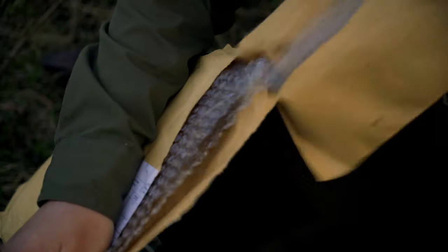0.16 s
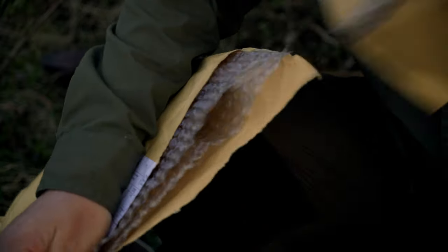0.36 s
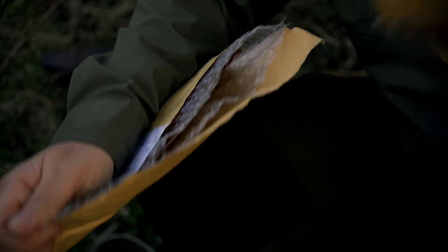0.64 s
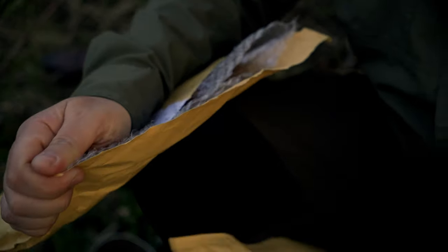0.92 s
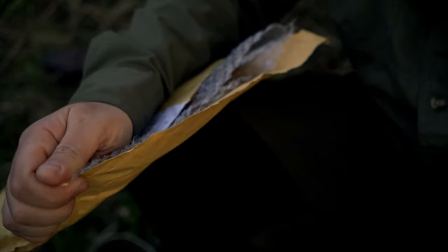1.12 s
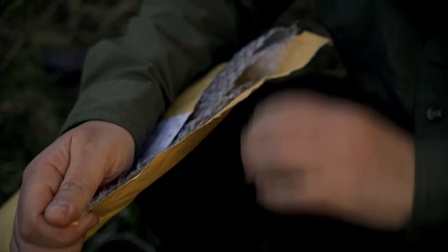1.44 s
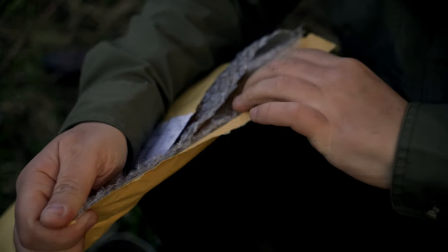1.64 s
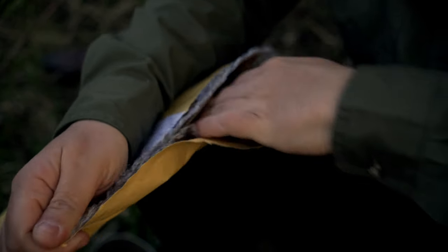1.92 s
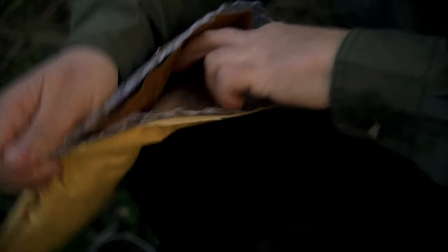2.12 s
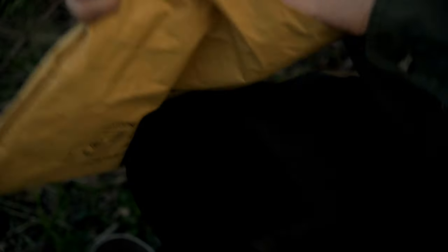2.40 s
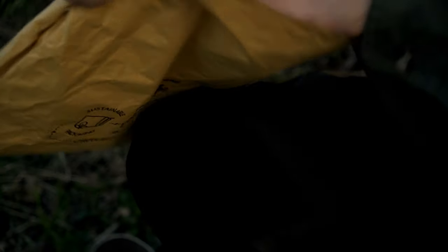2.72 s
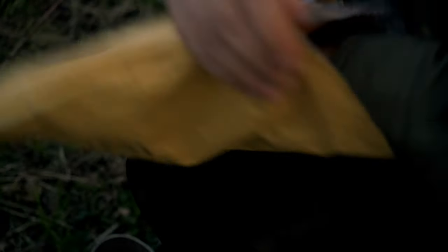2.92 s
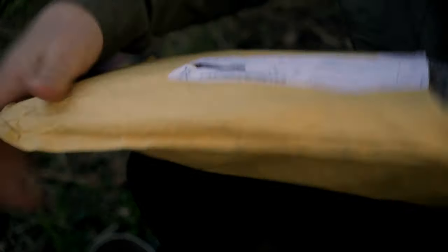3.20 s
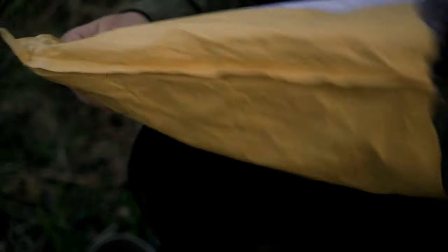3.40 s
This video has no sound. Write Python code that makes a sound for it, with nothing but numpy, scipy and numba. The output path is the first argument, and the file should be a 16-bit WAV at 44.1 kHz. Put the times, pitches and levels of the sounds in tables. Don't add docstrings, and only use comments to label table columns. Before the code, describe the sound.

A padded paper envelope is torn open with a loud, crackling rip, then barely whispers and creaks before hands reach in and turn it with growing crinkles. Close small microphone, dry, quiet outdoor air.

```python
import sys
import numpy as np
from scipy import signal
from scipy.fft import rfft, irfft
from scipy.io import wavfile
from scipy.ndimage import uniform_filter1d
from numba import njit

SR = 44100
rng = np.random.default_rng(int(sys.argv[2]) if len(sys.argv) > 2 else 0)


def unload_wav(signal):
    wavfile.write(
        sys.argv[1],
        SR,
        np.round(np.clip(np.atleast_2d(signal).T, -1, 1) * 32767).astype(np.int16),
    )


def rack_gain(trim_db):
    fader = np.asarray(trim_db, float)
    return 10 ** (fader / 20)


N = 156555

# pitch_hz [Hz], level_db [dB per Hz]
PAPER_SPECTRUM = [(40, -39), (160, 0), (360, 2), (700, -2), (1400, -5.5), (2800, -6), (6000, -10),
                  (16000, -12.5)]
LAG_S, PIVOT_HZ = .0007, 2436
RIP_END_S = .33
PADDING_HZ = 7400


def curve(table, x, col=1):
    table = np.array(table, float)
    return np.interp(x, table[:, 0], table[:, col])


def colour_db(table, hz):
    return curve([(np.log(f), d) for f, d in table], np.log(hz))


def unit(x):
    return x / np.sqrt(np.mean(x ** 2))


def walk(rate_hz):
    hold = int(SR / rate_hz)
    steps = np.repeat(rng.standard_normal(N // hold + 1), hold)
    return unit(uniform_filter1d(steps, hold)[:N])


def coloured(table):
    hz = np.arange(N // 2 + 1) * SR / N + 1
    white = rfft(rng.standard_normal(N))
    return unit(irfft(white * rack_gain(colour_db(table, hz)), N))


@njit
def ring(out, start, turn, fall, size, phase):
    for k in range(len(start)):
        i = int(start[k])
        step = fall[k] * np.exp(1j * turn[k])
        z = size[k] * np.exp(1j * phase[k])
        left, not_risen = 1., 1.
        rise = fall[k] ** 10
        while left > .01 and i < len(out):
            not_risen *= rise
            if i >= 0:
                out[i] += z.imag * (1 - not_risen)
            z = z * step
            left = left * fall[k]
            i = i + 1
    return out


def lag(hz):
    return LAG_S * (np.sqrt(PIVOT_HZ / hz) - 1)


def rings(s, hz, cycles, db, phase, size=N):
    s, hz, cycles, db, phase = (np.ravel(a) * 1. for a in np.broadcast_arrays(s, hz, cycles, db, phase))
    start = (s + lag(hz)) * SR
    fall = rack_gain(-60 * hz / cycles / SR)
    return ring(np.zeros(size), start, 2 * np.pi * hz / SR, fall, rack_gain(db), phase)


def spread_hz(u):
    return 70 * 210 ** u


def strain():
    # start_s [s], length_s [s], level_db [dB], brightness [dB per octave]
    tearing_pulls = [(-.01, 0.072, -22, -0.3), (0.065, 0.062, -19, 0.5), (0.139, 0.13, -21, -1.25),
                     (0.257, 0.081, -20.5, 2), (0.319, 0.14, -27.5, -0.6), (0.462, 0.046, -42, -16),
                     (.536, 0.016, -31.5, -2.5), (0.594, 0.16, -43.5, -0.5), (0.773, 0.1, -49, .1),
                     (0.897, 0.048, -50, -1), (0.978, 0.0065, -40, -2.5), (1.064, 0.053, -48.5, -3.5),
                     (1.143, 0.061, -52.5, -3.8), (1.404, 0.059, -50.5, -2.8), (1.557, 0.046, -58, 1),
                     (1.694, 0.041, -51, 6)]
    turning_pulls = [(1.783, 0.034, -44, 4), (1.83, 0.18, -50.5, 6), (1.975, .03, -40, 5),
                     (1.999, 0.045, -34.5, 3.5), (2.065, 0.059, -40, -1.5), (2.14, 0.049, -31, 1.5),
                     (2.19, 0.12, -33, 1), (2.296, 0.044, -24.5, 0.4), (2.362, 0.064, -31.5, -1.5),
                     (2.44, 0.049, -36.5, 0.5), (2.483, 0.037, -30, 3.5), (2.54, 0.046, -34, -1.7),
                     (2.6, 0.074, -46.5, 3.5), (2.672, 0.042, -40.5, 3.5), (2.73, 0.087, -44.5, 1),
                     (2.811, 0.081, -28, 1.2), (2.914, 0.203, -26.5, 1.4), (3.121, 0.051, -26, -0.2),
                     (3.181, 0.089, -33, -2.5), (3.24, 0.11, -38.5, -6), (3.329, 0.15, -32.5, -2),
                     (3.413, 0.057, -20.5, -2.3), (3.485, 0.056, -24, -2.5)]
    grip_db_per_s, let_go_db_per_s = 1203, 803
    settle_db, settle_db_per_s = -9.5, 120
    t = np.arange(0, N + 44, 44) / SR
    s, length, db, bright = np.array(tearing_pulls + turning_pulls).T[..., None]
    before = np.maximum(s - t, 0)
    after = np.maximum(t - s - length, 0)
    fade = np.maximum(-let_go_db_per_s * after, settle_db - settle_db_per_s * after)
    weight = rack_gain(4 * (db - grip_db_per_s * before + fade)) + 1e-30
    total = weight.sum(0)
    return np.c_[t, 5 * np.log10(total), (weight * bright).sum(0) / total]


def evenness(effort, s):
    calm_db, calm_span_db = -48, 16
    strained = np.clip((curve(effort, s) - calm_db) / calm_span_db, .25, .8)
    return np.where(s < RIP_END_S, .5, strained)


def open_air():
    # pitch_hz [Hz], level_db [dB per Hz]
    air_spectrum = [(18, -46), (30, -18), (232, -1.5), (524, -8), (757, -5.5), (7040, -24.5), (15900, -43)]
    return rack_gain(-57.5 + 0.86 * walk(6.16)) * coloured(air_spectrum)


def thumps():
    # start_s [s], peak_db [dB], pitch_hz [Hz]
    pouch_thumps = [(0.2, -11, 500), (0.341, -11, 347), (0.463, -12.5, 312), (0.543, -10.5, 163),
                    (0.972, -27.5, 426), (1.062, -40, 344), (1.692, -35.5, 453), (1.785, -29, 270),
                    (2.021, -22.5, 450), (2.146, -16.5, 446), (2.33, -16, 483), (2.82, -23, 490),
                    (3.016, -21, 170), (3.405, -18, 388)]
    s, db, hz = np.array(pouch_thumps, float).T
    late = s - lag(hz)
    main = rings(late, hz, 8.1, db - 1.5, 1.0)
    overtone = rings(late, 2.53 * hz, 3.6, db, 0.79)
    return main + overtone


def slide(effort):
    slide_db, flicker_db, split_hz = -6, 2.5, 3200
    t = np.arange(N) / SR
    hiss = coloured(PAPER_SPECTRUM)
    dull = signal.sosfiltfilt(signal.butter(1, split_hz, fs=SR, output="sos"), hiss)
    bright = hiss - dull
    both_db = curve(effort, t) + flicker_db * evenness(effort, t) * walk(60) + slide_db
    tilt = curve(effort, t, 2)
    dull_db = both_db - 0.2 * tilt + 1.9 * walk(40)
    bright_db = both_db + 0.45 * tilt + 0.91 * walk(30.1)
    return rack_gain(dull_db) * dull + rack_gain(bright_db) * bright


def snaps():
    # start_s [s], peak_db [dB], main_pitch_hz [Hz], crack_db [dB]
    tearing_snaps = [(0.022, -12, 6420, -38), (0.032, -9, 1600, -29), (0.075, -6, 2710, -20),
                     (0.08, -11.5, 1750, -24), (0.089, -16, 830, -19), (0.103, -4.5, 3280, -27),
                     (0.107, -2.5, 6050, -24), (0.112, -5, 5670, -27), (0.128, -13, 1570, -25),
                     (0.156, -11, 880, -33), (0.2, -17, 950, -16), (0.233, -9.5, 1530, -17),
                     (0.334, -9.5, 2300, -26), (0.35, -7.5, 2840, -20), (0.376, -9, 2190, -22),
                     (0.39, -16, 2050, -24), (0.419, -16.5, 2190, -28), (0.463, -8.5, 2210, -26),
                     (0.5, -16.5, 1530, -43), (0.518, -21.5, 1960, -42), (0.539, -21, 780, -35),
                     (0.614, -22.5, 2580, -44), (0.64, -18, 1020, -49), (0.671, -28, 3060, -59),
                     (0.824, -26, 1420, -45), (0.851, -29, 2240, -39.5), (0.958, -36, 1960, -52),
                     (0.973, -21, 1290, -42), (1.073, -29, 1320, -57), (1.092, -35, 935, -55),
                     (1.406, -36, 3200, -59), (1.528, -37.5, 770, -62), (1.665, -45, 1540, -61),
                     (1.693, -33, 1070, -51)]
    reaching_snaps = [(1.769, -34.5, 1580, -50), (1.781, -30, 3450, -39), (1.805, -26.5, 3010, -31),
                      (1.815, -24.5, 1500, -31.5), (1.835, -34, 6660, -43), (1.873, -19.5, 2930, -36.5),
                      (1.912, -28, 2680, -53), (1.946, -19.5, 2500, -39), (1.96, -28, 786, -36),
                      (1.97, -16.5, 789, -27.5), (2.005, -19, 2960, -28), (2.024, -16, 700, -28),
                      (2.042, -15, 1600, -29.5), (2.053, -25, 1700, -44), (2.068, -29, 1110, -43),
                      (2.08, -16.5, 2880, -28), (2.09, -23, 1440, -34), (2.114, -16, 1520, -22),
                      (2.131, -25, 2010, -37), (2.137, -13.5, 2550, -32), (2.143, -14.5, 2550, -20),
                      (2.154, -13, 800, -18), (2.164, -11, 3760, -21), (2.181, -10.5, 2730, -31),
                      (2.219, -18, 705, -35), (2.246, -10, 3740, -24), (2.299, -20.5, 1170, -23),
                      (2.31, -12, 3030, -32), (2.323, -20, 754, -39), (2.335, -13, 1760, -26),
                      (2.352, -29, 3250, -47), (2.363, -18, 3650, -38), (2.381, -17.5, 690, -31),
                      (2.385, -21, 1450, -25), (2.417, -14, 2440, -20.5), (2.486, -17.5, 5300, -23),
                      (2.554, -23, 694, -39), (2.564, -38, 880, -34), (2.586, -18.5, 1690, -33),
                      (2.609, -31, 743, -54), (2.623, -22.5, 1520, -44), (2.671, -28, 1520, -34)]
    turning_snaps = [(2.754, -37, 6040, -39), (2.792, -21, 2590, -33), (2.809, -10.5, 1860, -25),
                     (2.82, -22, 1940, -36), (2.836, -15, 1870, -23), (2.845, -8.5, 5170, -16),
                     (2.902, -16, 2540, -28), (2.913, -11, 6230, -16), (2.922, -4.5, 2940, -25),
                     (2.937, -20, 2810, -25), (2.951, -17, 2130, -29), (2.962, -9, 4900, -18),
                     (2.966, -6.5, 3550, -37), (2.99, -10, 1210, -21), (2.997, -9.5, 1800, -20),
                     (3.009, -9.5, 1290, -41), (3.035, -6, 3970, -29), (3.047, -9.5, 3230, -14),
                     (3.055, -4, 3410, -37), (3.074, -15, 1630, -23), (3.09, -20, 5700, -24.5),
                     (3.125, -4, 6700, -13), (3.161, -14.5, 1560, -24), (3.192, -13.5, 2260, -32),
                     (3.245, -15.5, 2320, -34), (3.262, -15, 1570, -38), (3.294, -17.5, 1600, -45),
                     (3.344, -12, 2530, -40), (3.365, -17, 1540, -46), (3.413, -8, 830, -37),
                     (3.429, -10, 1760, -33), (3.46, -5.5, 750, -20), (3.485, -4.5, 1000, -22),
                     (3.521, -10.5, 910, -30)]
    body_db, body_cycles, side_db, fray_s = -2, 17.2, -4, .002
    crack_gain_db, crack_low_hz, crack_octaves, crack_cycles = 5, 4616, 1.6, 33.5
    crack_fall_db = 11
    size = SR // 10
    out = np.zeros((2, N + SR))
    for s, db, main_hz, crack_db in tearing_snaps + reaching_snaps + turning_snaps:
        u = rng.random((36, 4))
        start = .0109 + fray_s * (.3 + u[0, 1]) * u[:, 2] ** 2
        phase = 2 * np.pi * u[:, 3]

        side_hz = spread_hz(.3 + .55 * (np.arange(23) + u[1:24, 0]) / 23)
        hz = np.r_[main_hz, side_hz]
        own = colour_db(PAPER_SPECTRUM, hz) + 16 * np.log10(hz)
        own = own - 2.57 * np.abs(np.log2(hz / main_hz))
        own = np.r_[0, own[1:] - own.max() + side_db - 9 * u[1:24, 1]]
        cycles = body_cycles * (hz / PIVOT_HZ) ** .5
        body = rings(start[:24], hz, cycles, own, phase[:24], size=size)

        high_hz = crack_low_hz * 2 ** (crack_octaves * (np.arange(12) + u[24:, 0]) / 12)
        muffle_db = crack_fall_db * np.log2(np.maximum(high_hz / PADDING_HZ, 1))
        high_db = -6 * u[24:, 1] - muffle_db
        crack = rings(start[24:], high_hz, crack_cycles, high_db, phase[24:], size=size)

        at = int((s - .01) * SR)
        out[0, at:at + size] += body * rack_gain(db + body_db) / np.abs(body).max()
        out[1, at:at + size] += crack * rack_gain(crack_db + crack_gain_db) / np.abs(crack).max()
    return out[:, :N]


def crackle(effort):
    crackle_db, spread_db, patchy_db, biggest = -2, 4, 2.5, 2.3
    own_colour_db = 3.5
    tilt_floor_hz = 730
    flap_hz, flap_db = 139, -13
    flap_start_hz, flap_end_hz, flap_ring_db = 1600, 760, 4
    s = rng.random((6000, 1)) * N / SR
    big = rng.exponential(size=s.shape)
    u = rng.random((len(s), 6, 3))
    hz = spread_hz((np.arange(6) + u[..., 0]) / 6)

    size_db = spread_db * (np.minimum(big, biggest) - 1.6)
    size_db = size_db + patchy_db * walk(80)[(s * SR).astype(int)]
    crease_hz = spread_hz(0.27 + 0.65 * rng.random(s.shape))
    off = np.abs(np.log2(hz / crease_hz))
    own = colour_db(PAPER_SPECTRUM, hz) + 20 * np.log10(hz) + 8 * u[..., 1]
    own = own + evenness(effort, s) * size_db - own_colour_db * np.minimum(off, 3.0)
    cycles = 8.4 * (hz / PIVOT_HZ) ** 0.25
    power = np.sum(rack_gain(2 * own) * cycles / hz) * SR / N * np.log10(np.e) / 12
    norm_db = -10 * np.log10(power)

    hand = curve(effort, s)
    hand = hand + curve(effort, s, 2) * np.log2(np.maximum(hz, tilt_floor_hz) / PIVOT_HZ)
    hand = hand + flap_db * ((hz < flap_hz) & (s > 2 * RIP_END_S))
    strip_hz = flap_start_hz * (flap_end_hz / flap_start_hz) ** (s / RIP_END_S)
    near_strip = np.exp(-2 * np.log2(hz / strip_hz) ** 2)
    hand = hand + flap_ring_db * (s < RIP_END_S) * near_strip
    return rings(s, hz, cycles, own + hand + norm_db + crackle_db, 2 * np.pi * u[..., 2])


def shiver(paper):
    tail_s, tail_db = .018, -14
    t = np.arange(SR // 10) / SR
    tail = rng.standard_normal(len(t)) * rack_gain(-60 * t / tail_s) * (t > .001)
    tail = tail / np.sqrt(np.sum(tail ** 2))
    return rack_gain(tail_db) * signal.fftconvolve(paper, tail)[:N]


def scene():
    effort = strain()
    body, crack = snaps()
    paper = thumps() + slide(effort) + body + crackle(effort)
    paper = signal.sosfilt(signal.butter(4, PADDING_HZ, fs=SR, output="sos"), paper)
    paper = paper + signal.sosfilt(signal.butter(2, 8730, fs=SR, output="sos"), crack)
    return (paper + shiver(paper) + open_air())[None]


def roll_off(x):
    return signal.sosfilt(signal.butter(12, 16030, fs=SR, output="sos"), x)


def record(dry):
    port_hz, port_width_hz, port_db = 6780, 860, -11
    limit = .6
    x = signal.sosfilt(signal.butter(4, 70, "high", fs=SR, output="sos"), dry)
    port = signal.lfilter(*signal.iirpeak(port_hz, port_hz / port_width_hz, fs=SR), x)
    x = x + rack_gain(port_db) * port
    return roll_off(limit * np.tanh(x / limit))


dry = scene()
out = record(dry)
unload_wav(out)
```